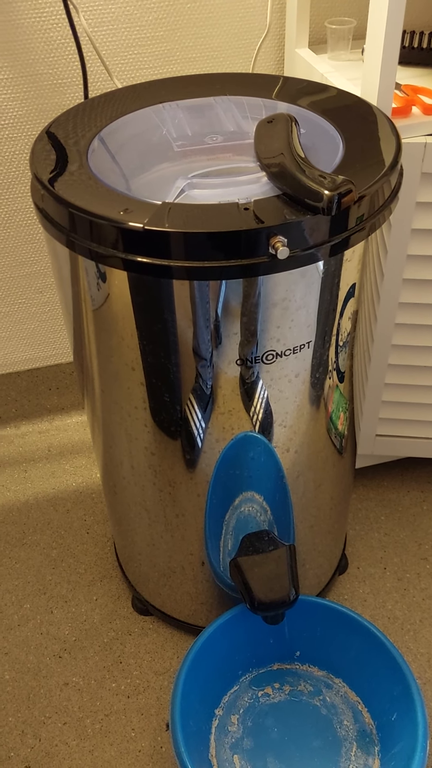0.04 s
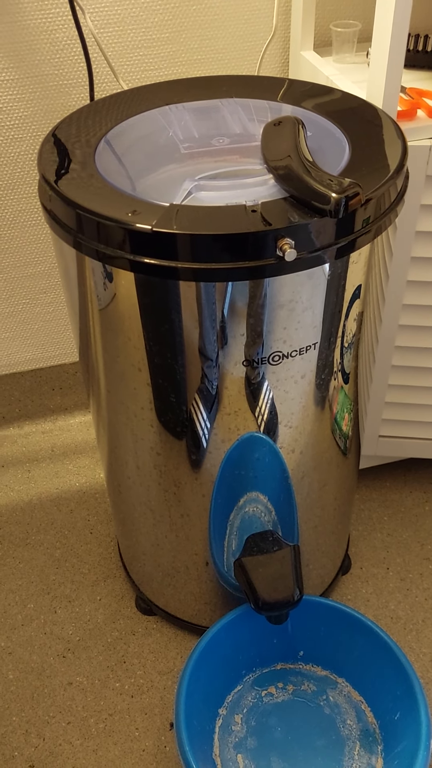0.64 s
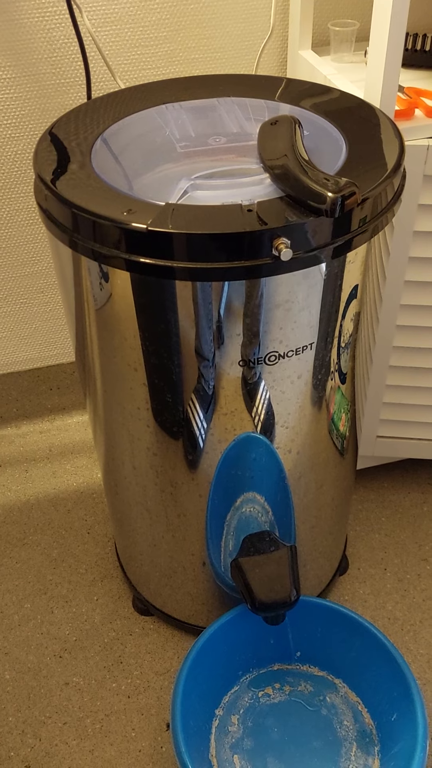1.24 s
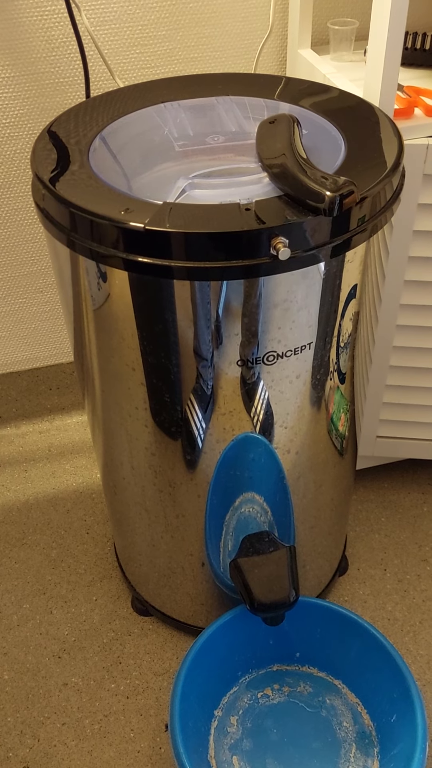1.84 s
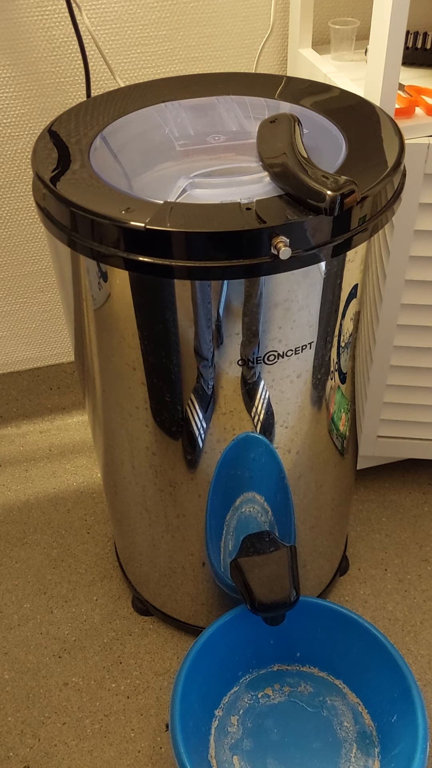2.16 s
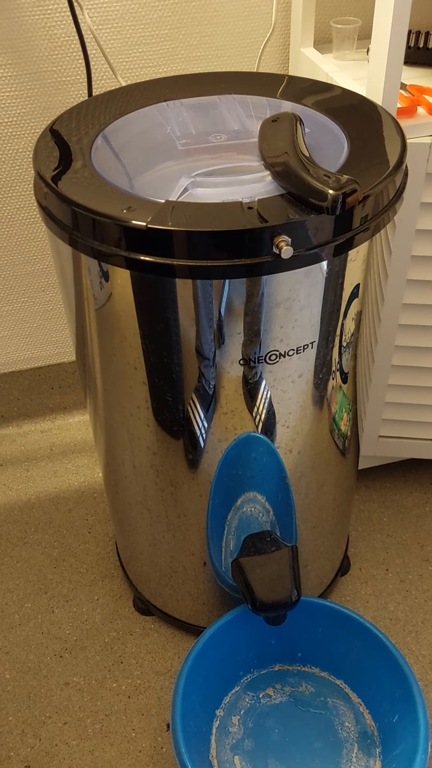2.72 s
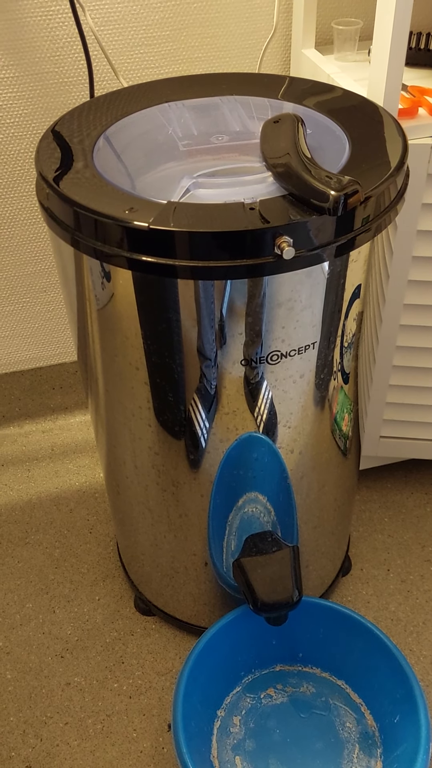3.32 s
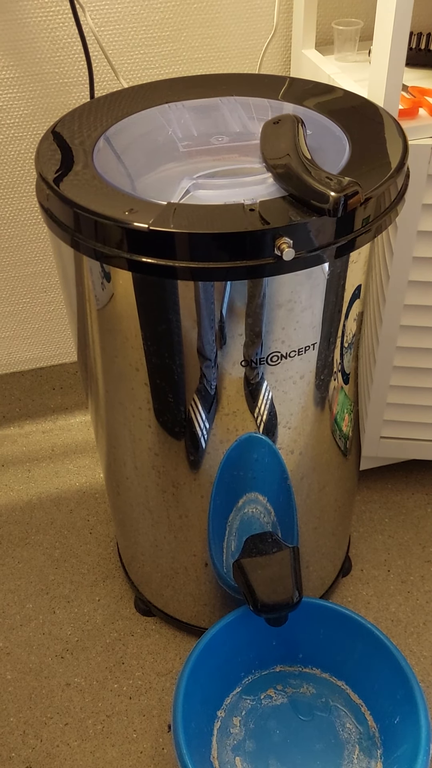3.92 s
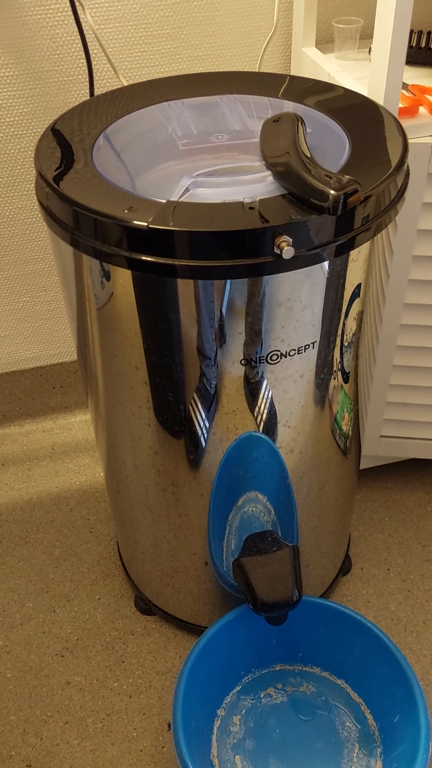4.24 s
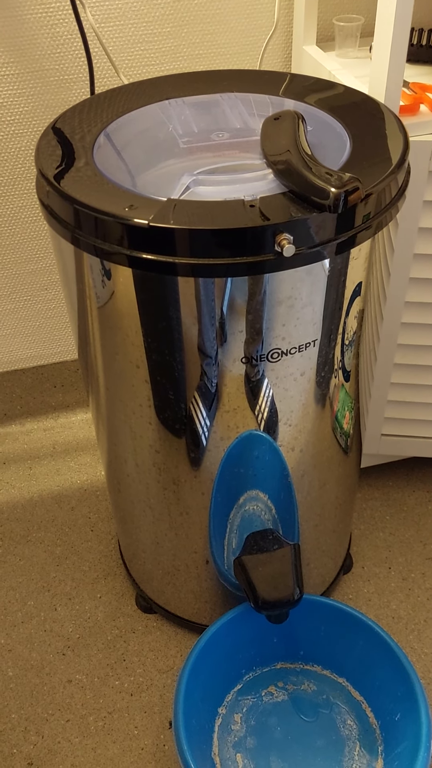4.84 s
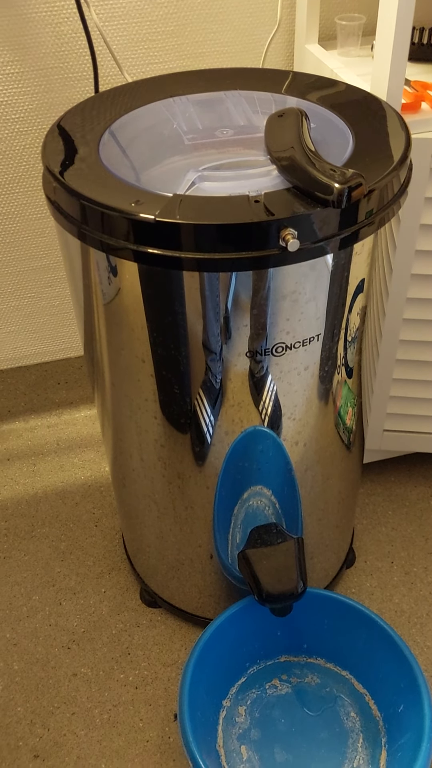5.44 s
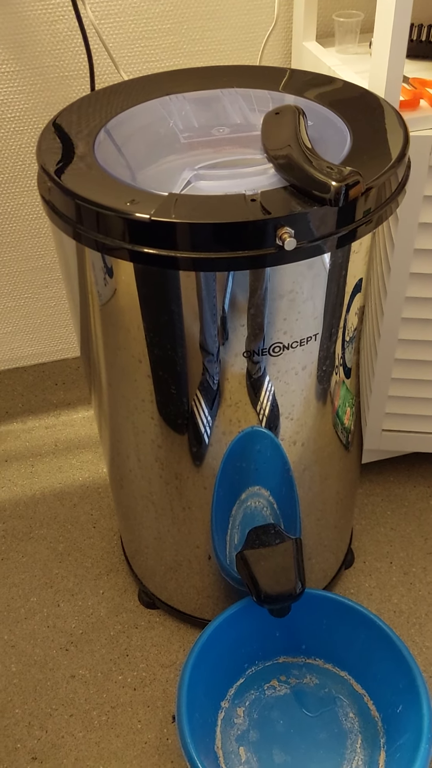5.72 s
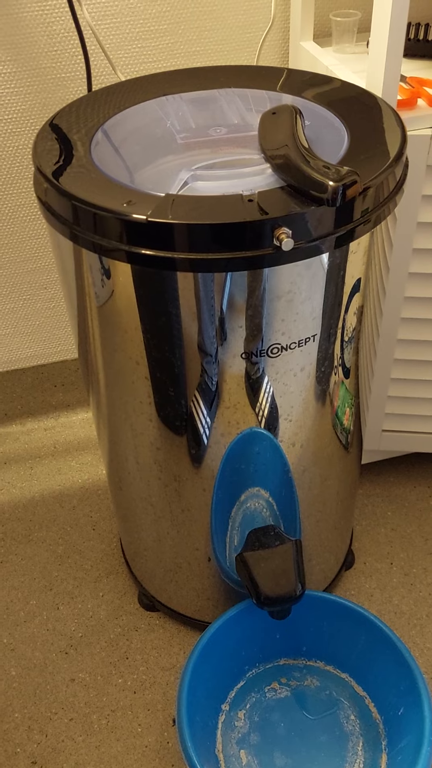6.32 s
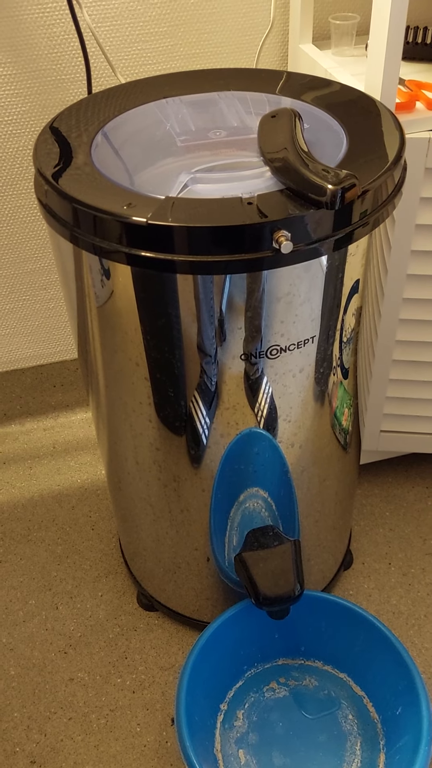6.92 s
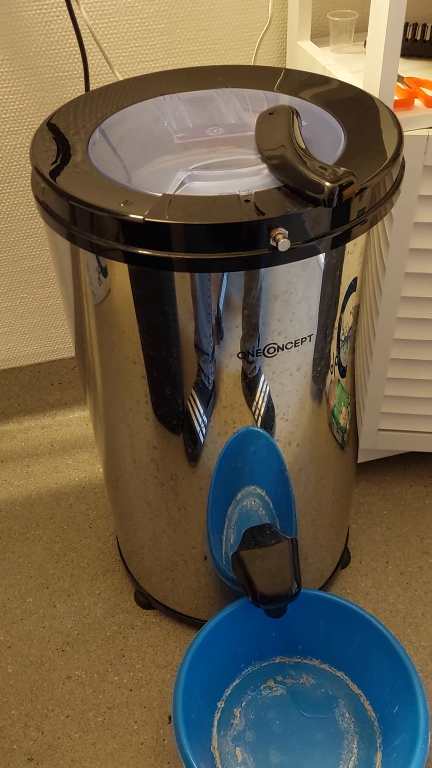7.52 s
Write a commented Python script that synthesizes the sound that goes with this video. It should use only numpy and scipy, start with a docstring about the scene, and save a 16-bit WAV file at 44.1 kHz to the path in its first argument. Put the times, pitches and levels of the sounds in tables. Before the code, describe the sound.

A spin dryer runs steadily in a small room, with a low motor hum, a rumble and an airy whirr.

```python
"""Spin dryer in a small room, its drum creeping up to full speed at about 45 turns a second.
The unbalanced drum hums through the steel housing at multiples (orders) of its speed.
Air churned by the drum rumbles; bearings and rushing air whirr in the housing's resonances.
All three sound throughout, at a close stereo microphone."""
import sys
import numpy as np
from scipy import signal
from scipy.fft import rfft, irfft
from scipy.io import wavfile

SR = 44100
rng = np.random.default_rng(int(sys.argv[2]) if len(sys.argv) > 2 else 0)


def dump(signal):
    """Clip the signal to [-1, 1] and save it as 16-bit WAV at the path in sys.argv[1]."""
    limited = np.clip(np.atleast_2d(signal).T, -1, 1)
    pcm = np.round(limited * 32767).astype(np.int16)
    wavfile.write(sys.argv[1], SR, pcm)


N = 333396
T = np.arange(N) / SR
HZ = np.fft.rfftfreq(N, 1 / SR)


def amp(db):
    """Decibels to gain."""
    return 10 ** (np.asarray(db) / 20)


def unit_rms(x):
    """Scale to rms 1."""
    return x / np.sqrt(np.mean(x ** 2) + 1e-20)


def on_bins(points):
    """(f/Hz, value) points interpolated onto every bin over log frequency."""
    hz, value = np.transpose(points)
    return np.interp(np.log(HZ + 1), np.log(hz + 1), value)


def pan(side_db):
    """Left and right gains for a level difference L-R."""
    return amp(np.array([[.5], [-.5]]) * side_db)


def drift(rate_hz):
    """Slow random curve, rms 1."""
    lowpass = np.exp(-(HZ / rate_hz) ** 2)
    return unit_rms(irfft(rfft(rng.standard_normal(N)) * lowpass, N))


def noise_pair(correlation):
    """Two white noise spectra with the given correlation."""
    left, other = rng.standard_normal((2, 2 * len(HZ))).view(complex)
    right = correlation * left + np.sqrt(1 - correlation ** 2) * other
    return np.array([left, right])


def drum_speed_hz(start_hz=44.58, full_hz=45.4, settle_s=5.9):
    """Rotation rate: the gap to full speed closes exponentially."""
    return full_hz - (full_hz - start_hz) * np.exp(-T / settle_s)


def drum_tone(order, level_db, side_db, lead_rad):
    """Stereo sine locked to a multiple of the drum's rotation."""
    turns = np.cumsum(drum_speed_hz()) / SR
    phase = 2 * np.pi * (order * turns + rng.random())
    return np.sqrt(2) * amp(level_db) * pan(side_db) * np.sin([phase + lead_rad, phase])


# Orders driving a housing resonance:
# order, on-resonance level/dB, resonance f/Hz, width/Hz, waver/dB, L-R/dB, left lead/rad
RESONANT_ORDERS = [(2, -30.5, 89, 12, 0.86, -2, 0.068), (5, -33, 222, 7.5, 0.4, 0.5, 0.034),
                   (6, -28, 270.15, 2.36, 0.14, -4.5, 0.38)]
# Weak orders: order, level/dB, L-R/dB, left lead/rad
WEAK_ORDERS = [(1, -57, -5.5, 1), (3, -62, -4, 0), (4, -44.5, -3, 0.45), (7, -54.5, 0.5, 2),
               (9, -63.5, -8, 4), (11, -66, 7, -0.5), (14, -69, -14, -3.5), (18, -66, 9, -0.5)]


def hum(weak_waver_db=1.5, waver_hz=3):
    """The unbalanced drum shakes the housing; strong orders swell and fade with its resonances."""
    tones = np.zeros((2, N))
    for order, peak_db, hz, width_hz, waver_db, side_db, lead_rad in RESONANT_ORDERS:
        detune_hz = order * drum_speed_hz() - hz
        loss_db = 10 * np.log10(1 + (2 * detune_hz / width_hz) ** 2)
        tones += drum_tone(order, peak_db - loss_db + waver_db * drift(waver_hz), side_db, lead_rad)
    for order, level_db, side_db, lead_rad in WEAK_ORDERS:
        tones += drum_tone(order, level_db + weak_waver_db * drift(waver_hz), side_db, lead_rad)
    return tones


# Stereo balance of broadband noise: f/Hz, L-R/dB
NOISE_BALANCE = [(60, -5), (110, -2.5), (200, -3.5), (380, -4), (700, -4), (1290, 0), (2380, -2.5),
                 (4400, -1), (8120, 0.5), (15000, -2.0)]
# Stereo likeness of broadband noise: f/Hz, L/R correlation
NOISE_CORRELATION = [(30, 0.78), (80, 0.94), (120, 0.91), (150, 0.75), (200, 0.99), (400, 0.83),
                     (480, 0.25), (700, 0.25), (900, 0.28), (1300, 0.33), (2000, 0), (16000, 0)]


def resonant_noise(broadband, resonances):
    """Broadband noise plus a noise band ringing in each resonance; stereo, rms 1."""
    spectrum = noise_pair(on_bins(NOISE_CORRELATION)) * amp(on_bins(broadband))
    spectrum *= pan(on_bins(NOISE_BALANCE))
    for hz, width_hz, peak_db, side_db, correlation in resonances:
        peak = 1 / (1 + 2 * ((HZ - hz) / width_hz) ** 2)
        spectrum += noise_pair(correlation) * peak * amp(peak_db) * pan(side_db)
    return unit_rms(irfft(spectrum, N))


# Churning air spectrum: f/Hz, relative level/dB
CHURNING_AIR = [(20, -23), (39, -22), (51, -9.5), (62, -7), (76, -4.5), (110, 1), (150, -7.5), (190, -2),
                (222, -3.5), (235, -4), (280, -12.5), (335, -12.5), (430, -20), (700, -38)]
# Low tub and room resonances: f/Hz, width/Hz, relative level/dB, L-R/dB, L/R correlation
TUB_ROOM_MODES = [(73.5, 8, -4.5, -2, 1), (133.4, 10.8, 1, 5, 0.99), (161.7, 8.6, 2.5, -8.5, 0.97),
                  (202.4, 11.6, 1.5, -4, 0.97), (210, 8.1, 4.5, -5, 0.86), (248, 4.3, -2, 6, 1),
                  (329.5, 5.9, -13, -5, 0.96), (381.5, 7, -10.5, -3, 0.7)]


def rumble():
    """Turbulence between drum and tub, nearly the same in both channels."""
    return resonant_noise(CHURNING_AIR, TUB_ROOM_MODES)


# Rushing air spectrum: f/Hz, relative level/dB
RUSHING_AIR = [(200, -30), (450, 0), (540, 2), (740, -1), (1100, 2.5), (1650, 1.5), (2100, 0.5), (3300, -1),
               (4400, 1.5), (5800, -3), (8300, -8), (10300, -7.5), (12500, -2), (15700, -7.5)]
# Housing resonances: f/Hz, width/Hz, relative level/dB, L-R/dB, L/R correlation
HOUSING_MODES = [(596, 23, 12.5, -3, -0.55), (624, 9.4, 10.5, -6, -0.076), (878, 29, 6, 5, 1),
                 (931, 27, 4.5, -4, 0.79), (1130, 20, 4, -11, -0.2), (1203, 31, 9.5, 0, 0.5),
                 (1245, 13, 10, 11, 0.2), (1370, 12, 4.5, -5, 0.27), (1509, 44, 5.5, -2, 0.15),
                 (1660, 370, -1, -5, -0.55), (2430, 28, -9, 1, 0), (2655, 52, 1.5, -8.5, -0.25),
                 (4610, 300, -1, -3, 0.27), (4967, 300, 5.5, -2.5, 0.06)]


def whirr(flutter_db=0.46, flutter_hz=25):
    """Air and bearing noise, part direct and part ringing in the housing, with a slight flutter."""
    return resonant_noise(RUSHING_AIR, HOUSING_MODES) * amp(flutter_db * drift(flutter_hz))


def room(x, wet_db=-10, t60_s=0.34):
    """Dense wall reflections, independent in each channel, ripple the spectrum finely."""
    taps = SR // 2
    tail = rng.standard_normal((2, taps)) * 1000 ** (-T[:taps] / t60_s)
    tail /= np.linalg.norm(tail, axis=1, keepdims=True)
    primed = np.concatenate([x[:, -taps:], x], axis=1)  # the room already rings at t = 0
    reflections = signal.fftconvolve(primed, tail, axes=1)[:, taps:taps + N]
    return x + amp(wet_db) * reflections


def scene(rumble_db=-33.0, whirr_db=-38.0):
    """Hum and rumble, plus the whirr with its room reflections."""
    return hum() + amp(rumble_db) * rumble() + amp(whirr_db) * unit_rms(room(whirr()))


def record(dry, cutoff_hz=15790):
    """Steep low-pass band limit."""
    lowpass = signal.firwin(1023, cutoff_hz, window=("kaiser", 9), fs=SR)
    return signal.oaconvolve(dry, lowpass[None], "same")


dry = scene()
out = record(dry)
dump(out)
```